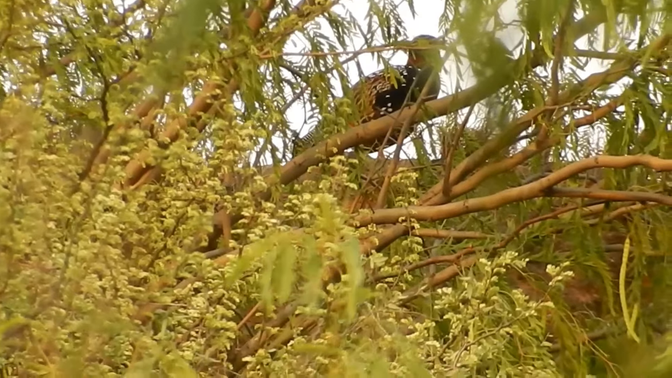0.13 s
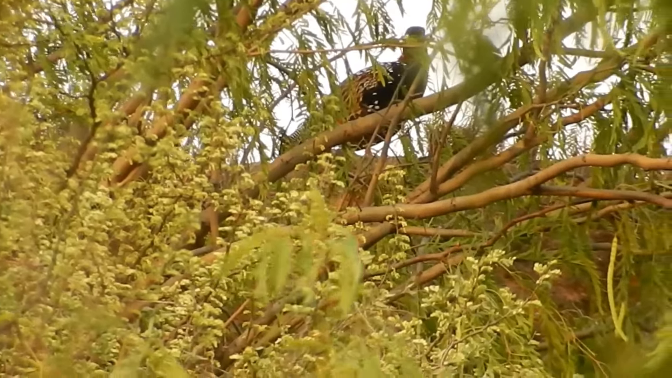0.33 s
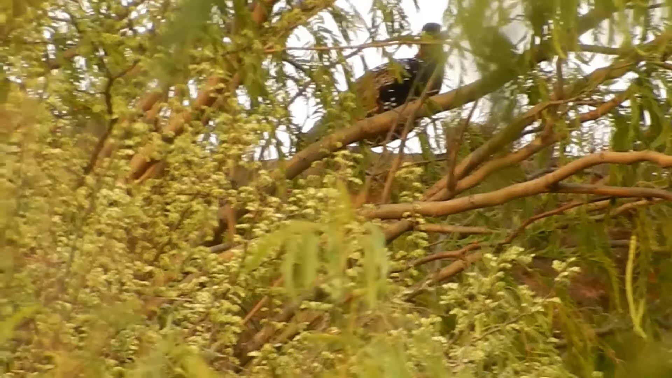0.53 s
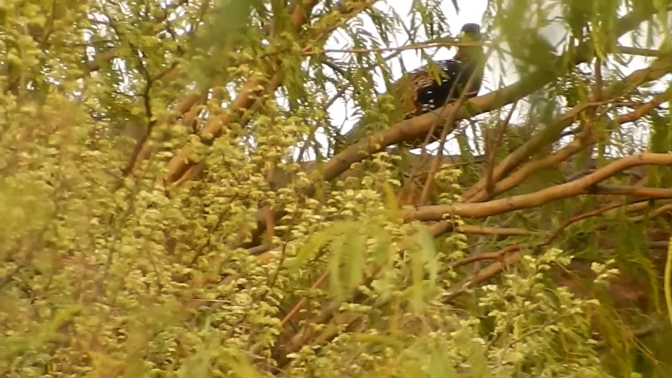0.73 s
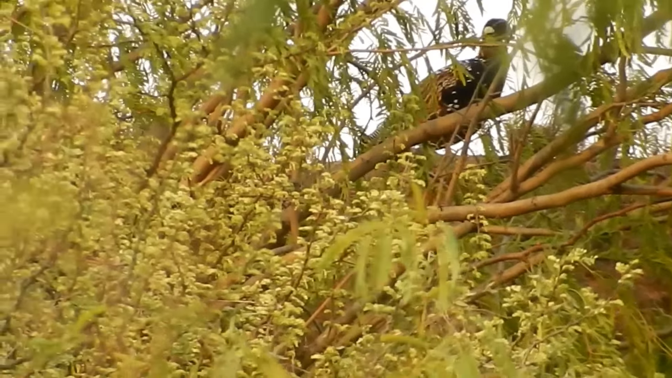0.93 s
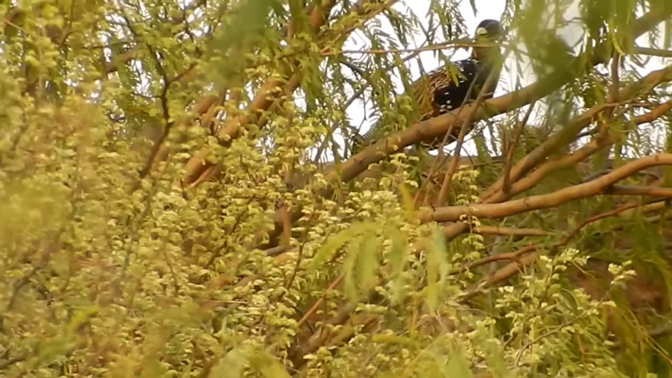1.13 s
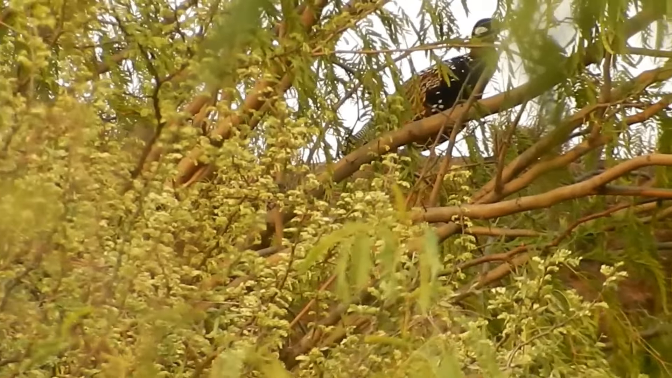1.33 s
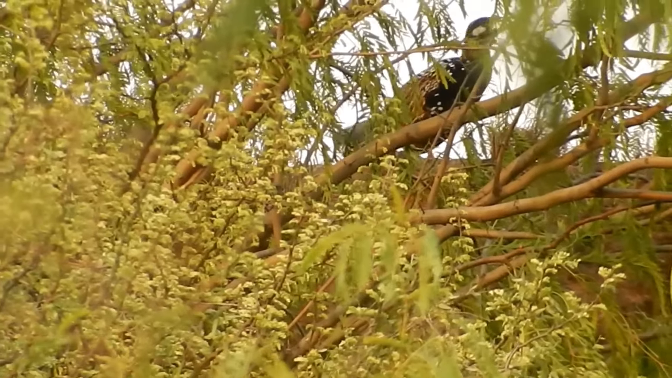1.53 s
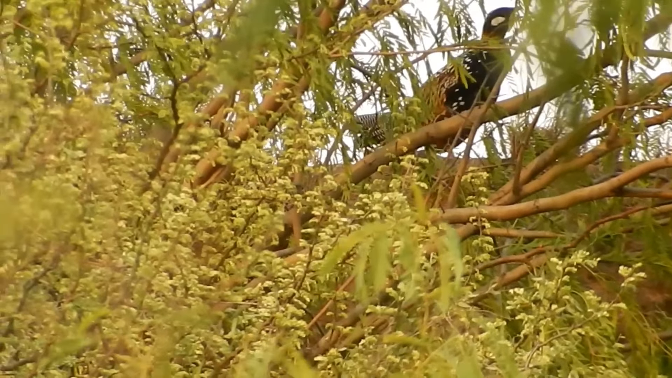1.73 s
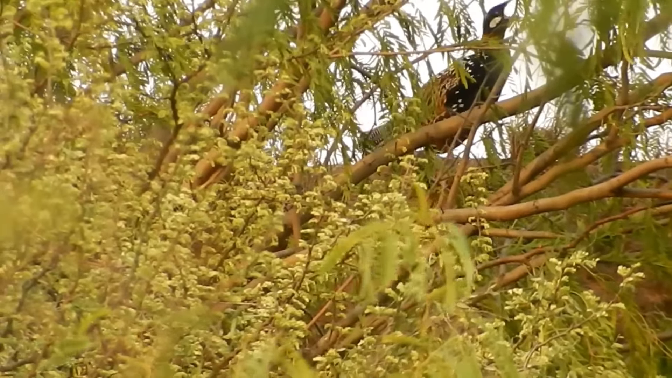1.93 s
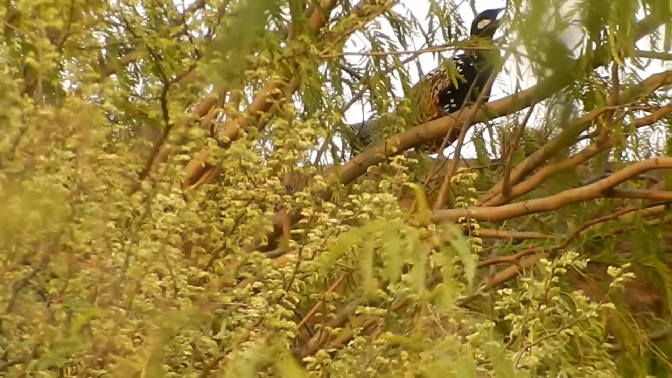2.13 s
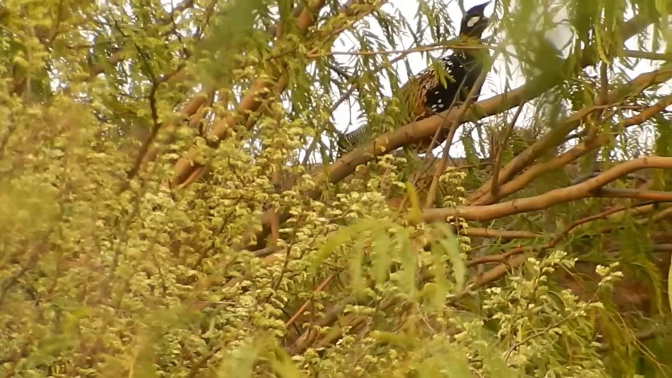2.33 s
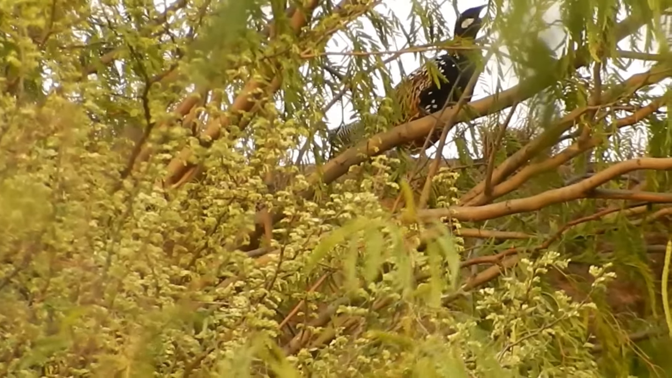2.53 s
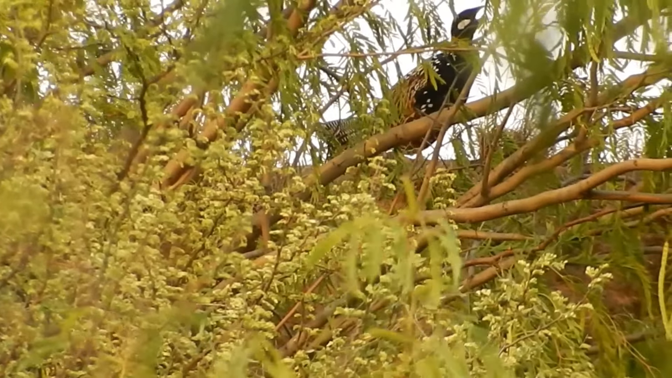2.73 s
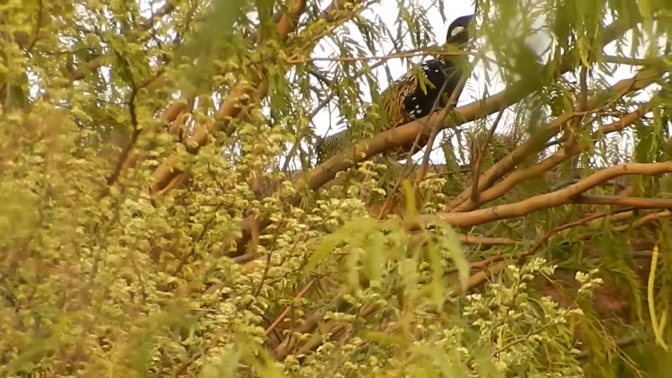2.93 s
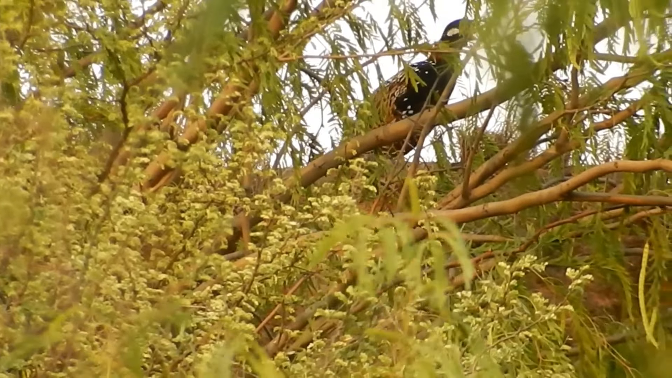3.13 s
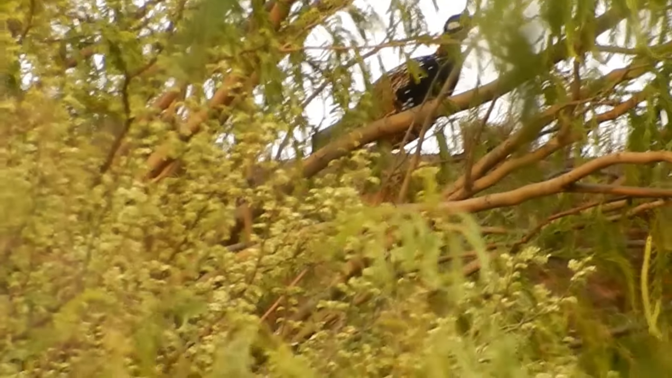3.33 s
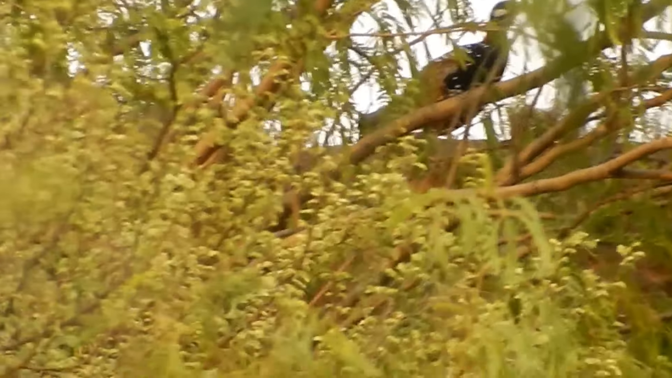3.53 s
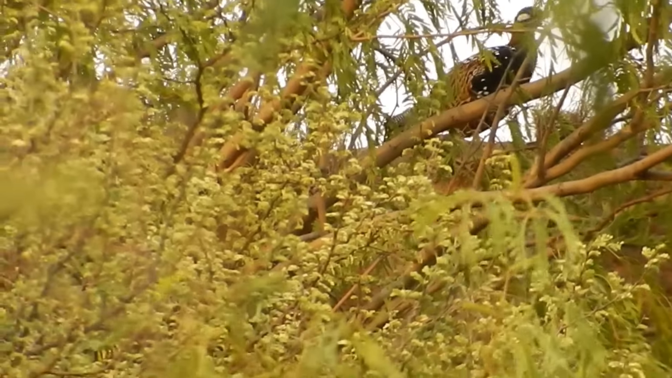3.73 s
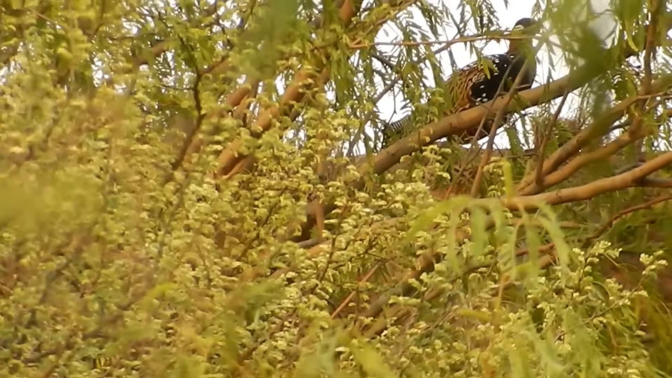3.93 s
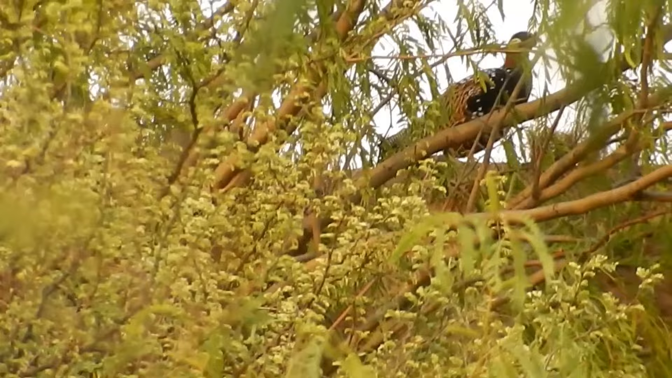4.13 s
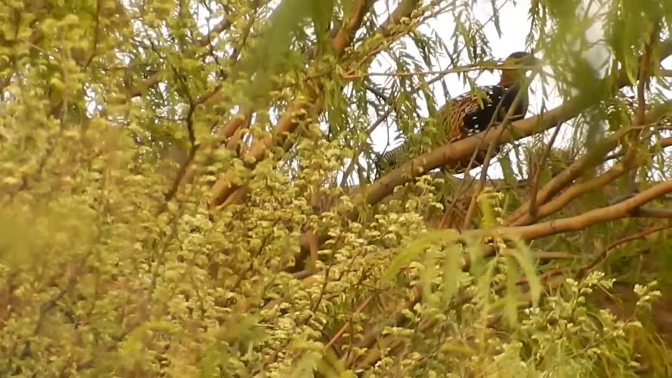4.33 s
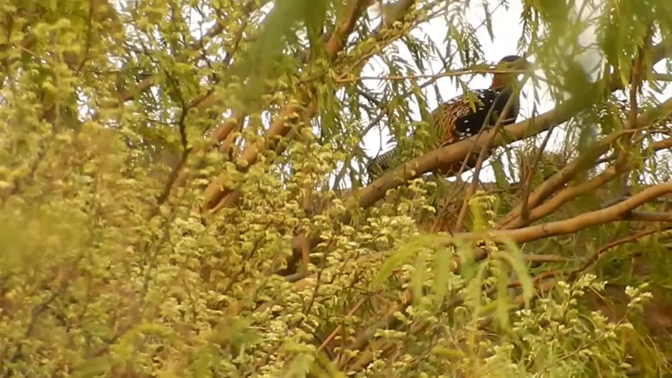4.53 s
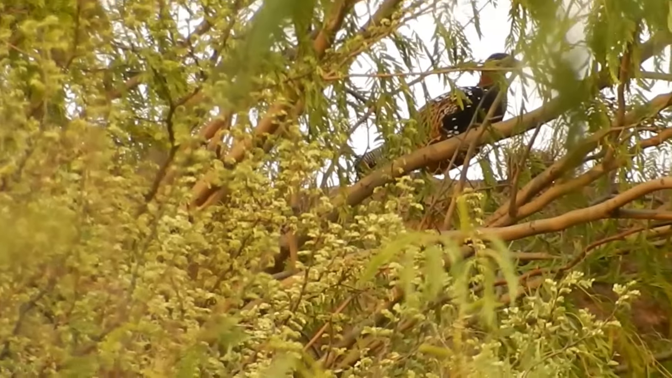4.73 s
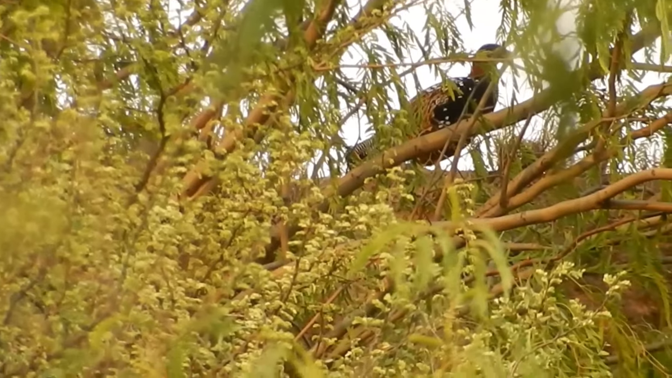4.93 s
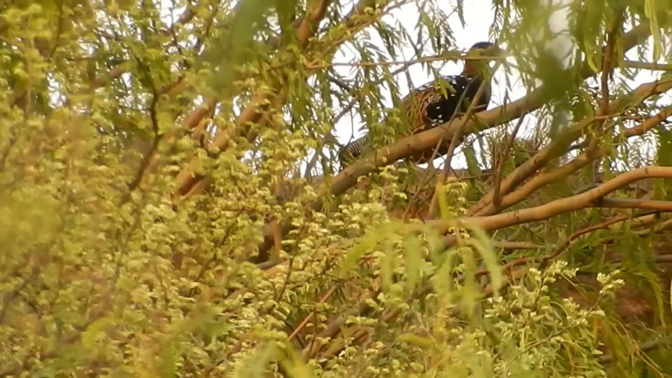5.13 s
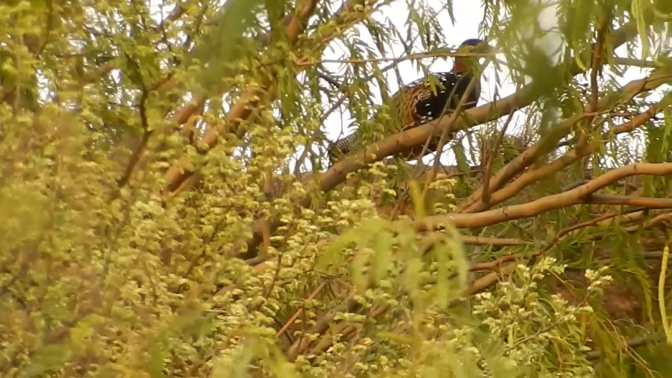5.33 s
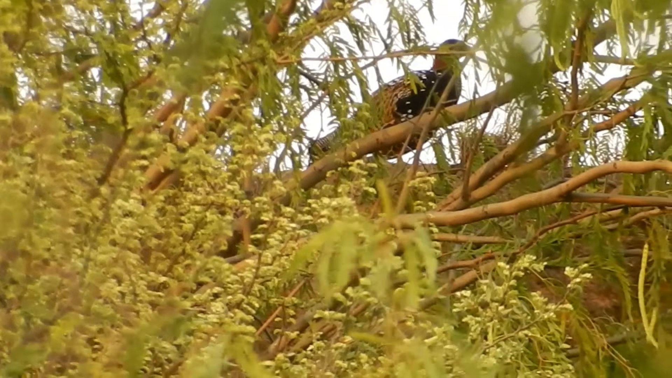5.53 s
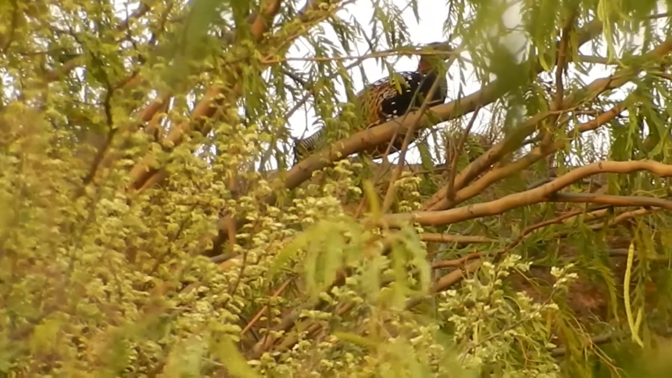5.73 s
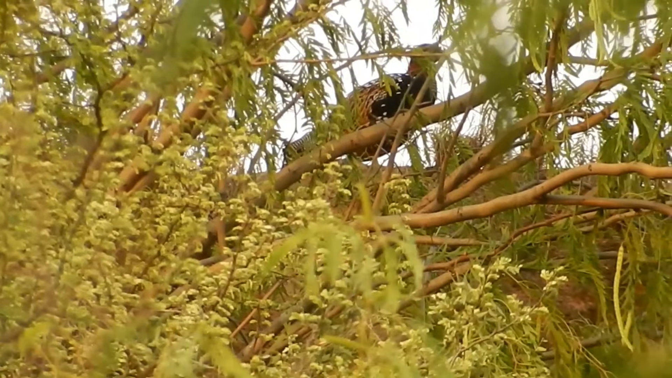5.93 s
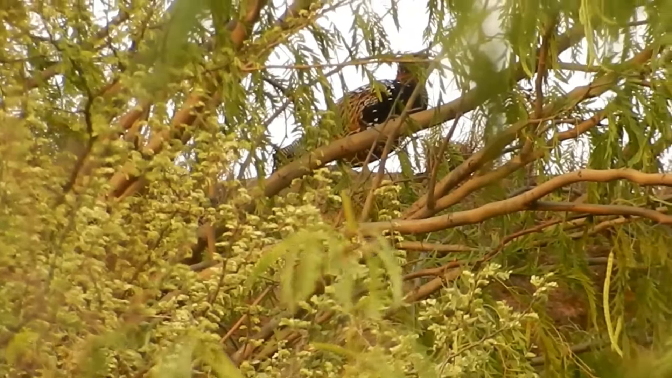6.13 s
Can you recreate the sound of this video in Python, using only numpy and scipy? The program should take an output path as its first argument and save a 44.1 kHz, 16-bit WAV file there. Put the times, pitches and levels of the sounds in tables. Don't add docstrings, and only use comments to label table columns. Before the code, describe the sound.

Quiet open woodland with soft low rumble, wind and leaf hiss. Nearly two seconds in, a ground bird up in a tree gives a sharp click and tiny high whistle, then four loud, metallic, rasping buzzes in two pairs. Trees return a diffuse echo. Later a faint short croak and sparse distant birds are heard. The stereo microphone is outdoors, at some distance from the caller.

```python
import sys
import numpy as np
from scipy import signal
from scipy.io import wavfile
from scipy.ndimage import uniform_filter1d

SR = 44100
rng = np.random.default_rng(int(sys.argv[2]) if len(sys.argv) > 2 else 0)


def volts_from_db(level):
    exponent = np.asarray(level, float) / 20
    return 10 ** exponent


def master_out(mix):
    frames = np.transpose(np.atleast_2d(mix))
    ceiling = np.clip(frames, -1, 1)
    pcm = np.round(ceiling * 32767).astype(np.int16)
    wavfile.write(sys.argv[1], SR, pcm)


N = 272582

# start in seconds, end in seconds, level in dB,
# opening shortfall in dB, flutter in cycles per second.
NOTES = [
    (2.236, 2.425, -23, 9.5, 244),
    (2.608, 2.84, -25, 20, 244),
    (3.112, 3.243, -25.5, 16, 243),
    (3.299, 3.525, -25.5, 13.5, 245),
]
# multiple of the pitch, level in dB.
BUZZ_OVERTONES = [(2, -31.5), (3, -26.5)]
# centre in Hz, width in Hz, gain in dB.
THROAT_MODES = [(2190, 302, 3.5), (2754, 360, 8.5), (3658, 480, 15.5), (4430, 400, 3), (5293, 660, 2.5)]
# centre in Hz, width in Hz, gain in dB.
BEAK_MODES = [(6585, 1080, 8.5), (8080, 900, 1.5), (11700, 1100, -11)]
# start, end, crest and dip in seconds, level in dB.
WHISTLES = [
    (1.8178, 1.847, 1.8365, 1.8345, -27),
    (2.77, 2.803, 2.788, 2.782, -32),
    (3.366, 3.392, 3.38, 3.379, -34),
]
# partial number, level in dB re the fourth.
WHISTLE_PARTIALS = [(1, -30), (2, -29), (6, -41), (7, -31), (8, -42), (10, -54)]
# time in seconds, peak in dB.
SNAPS = [
    (1.8172, -34.5),
    (1.8448, -33),
    (2.7995, -31),
]
# start and end in seconds, from Hz, to Hz, peak in dB.
CLICK = [
    (1.774, 1.783, 1640, 1500, -32),
    (1.781, 1.799, 2450, 1300, -34),
]
CLICK_PARTIALS_DB = [
    (-18, 0, -17, -21.5, -31.5, -35, -49),
    (-4.5, 0, -10.5, -38.5, -38.5, -44.5, -43),
]
# peak in seconds, pitch in Hz, level in dB,
# rise in seconds, fall in seconds.
GRUNTS = [
    (2.42, 1192, -54.5, 0.027, 0.0059),
    (2.615, 1303, -52, 0.0056, 0.04),
    (2.83, 1326, -49, 0.017, 0.0072),
    (3.12, 1236, -49.5, 0.0083, 0.027),
    (3.228, 1284, -50, 0.016, 0.008),
    (3.303, 1244, -51.5, 0.0043, 0.025),
    (3.51, 1225, -54.5, 0.017, 0.016),
]
# start and end in seconds, from Hz, to Hz, peak in dB.
FAR_BIRDS = [(3.26, 3.349, 601, 549, -63.5), (4.07, 4.102, 2027, 2066, -75),
             (4.096, 4.112, 1995, 1400, -71.5), (4.14, 4.19, 6140, 5770, -83.5),
             (4.173, 4.196, 5300, 5600, -76.5), (4.19, 4.215, 4360, 4430, -75.5),
             (4.175, 4.25, 2640, 2690, -75), (4.175, 4.21, 1800, 1710, -74.5),
             (5.235, 5.3, 3760, 3300, -80.5), (5.31, 5.38, 2950, 2750, -78), (5.5, 5.564, 3210, 3160, -79),
             (5.59, 5.617, 3180, 3170, -77.5), (5.755, 5.795, 3780, 4330, -77.5),
             (5.785, 5.876, 4290, 4330, -71.5), (5.94, 5.989, 3480, 3400, -76)]
# time in seconds, level in dB.
INSECT = [
    (.17, -84),
    (.52, -87),
    (.85, -97),
]
# frequency in Hz, 60 dB decay time in seconds.
ECHO_T60 = [(1000, 3.9), (3000, 1.42), (5500, 1.1), (9000, 1.4), (14000, .3)]
# frequency in Hz, density in dB per Hz.
AIR = [(12, -42), (20, -12), (49, -0.5), (124, 0.5), (209, -5.5), (313, -8), (352, -9), (1100, -18.5),
       (1390, -24), (1890, -17.5), (2460, -30), (3120, -27.5), (3950, -29.5), (5770, -39.5), (7500, -64),
       (12700, -120)]
# centre in Hz, width in Hz, level in dB.
AIR_BANDS = [(1148, 60, -77), (1870, 210, -74.5), (2950, 650, -75), (5960, 170, -89.5), (10700, 7500, -96)]
# frequency in Hz, left-right likeness from -1 to 1.
LIKENESS = [(60, 0.2), (180, 0.21), (560, 0.23), (1730, 0.39), (5320, 0.17)]

OPEN_S, RELEASE_S, RELEASE_DB = 0.012, 0.032, 26
SWELL_DB = (4, -2.8)
RESUME_DB, RESUME_S = 3, 0.0048
WHISTLE_OVERLAP_S = 0.004
FLUTTER_SAG_HZ, SAG_S = 33, 0.08
CREST_HZ, CREST_RISE_HZ_PER_S, CREST_HZ_PER_DB, ARCH_DEPTH_HZ = 4951, 1900, 90.5, 2779
WEAK_ARCH_DB, WEAK_ARCH_DEPTH, STRONG_SHARE = -6, 0.7, 0.6
ROUGH, ROUGH_WANDER, THROAT_WANDER_DB = 0.26, 0.04, 2.2
VOICE_BAND_HZ, RASP_BAND_HZ, OVERTONE_GAP_HZ = (1530, 5130), (350, 1500), (13300, 15100)
RASP_DB, FUNDAMENTAL_DB = -36.5, -44.5
WHISTLE_CREST_HZ, RISE_HZ_PER_MS2, FALL_HZ_PER_MS2 = 5620, 1.6, 2.8
DIP_DB, DIP_S, AFTER_DIP_DB, SURGE_DB, SURGE_S = 14, 0.0025, -4.5, 5, 0.0025
CLICK_ROUGH, CLICK_EDGE_DB, GRUNT_EDGE_DB, FAR_EDGE_DB = (0.1, 0.2), 10, 9, 4.5
CROAK_S, CROAK_HOLD_END_S, CROAK_SETTLE_S, CROAK_PULSES_PER_S = 4.495, 4.577, 0.012, 170
CROAK_LOWER_HZ, CROAK_UPPER_HZ = 1344, 2800
CROAK_DB, CROAK_UPPER_DB, CROAK_ACCENT_DB = -50, -8, 4
PUFF_DELAY_S, PUFF_DB, PUFF_FADE_S = 0.028, -7, 0.05
TICK_S, TICK_DB = 4.4695, -53
NEAR_ECHO_DB, NEAR_T60_S = -13, 0.06
MID_ECHO_DB, MID_T60_SHARE = -17.5, 0.27
FAR_ECHO_DB = -28
AIR_DB = -55
AIR_DIP_HZ, AIR_DIP_WIDTH_HZ, AIR_DIP_SHARE = 2700, 210, 0.72
TREBLE_SIDE_DB = -12.5
SKEW_DB = -18


def rms_one(x):
    return x / np.sqrt(np.mean(x ** 2) + 1e-20)


def at_hz(points, hz):
    table_hz, values = np.transpose(points)
    return np.interp(np.log(hz), np.log(table_hz), values)


def filtered(x, order, hz, kind):
    return signal.sosfilt(signal.butter(order, hz, kind, fs=SR, output="sos"), x)


def drift(rate_hz, size=N):
    r = np.exp(-2 * np.pi * rate_hz / SR)
    return rms_one(signal.lfilter([1], [1, -2 * r, r * r], rng.standard_normal(size + SR))[SR:])


def phase_of(hz):
    return 2 * np.pi * np.cumsum(hz) / SR


def resonance(x, hz, width_hz):
    r = np.exp(-np.pi * width_hz / SR)
    poles = [1, -2 * r * np.cos(2 * np.pi * hz / SR), r * r]
    return signal.lfilter(np.array([1, 0, -1]) * (1 - r * r) / 2, poles, x)


def through(modes, x):
    return sum(volts_from_db(db) * resonance(x, hz, width_hz) for hz, width_hz, db in modes)


def note(rows, fade_s=0.0019):
    s, *columns = np.transpose(rows)
    at = np.arange(int(s[0] * SR), int(s[-1] * SR))
    gate = np.clip(np.minimum(at - at[0], at[-1] - at) / (fade_s * SR), 0, 1)
    return at, gate, [np.interp(at / SR, s, c) for c in columns]


def arch(row, edge_db):
    start, end, from_hz, to_hz, db = row
    middle = ((start + end) / 2, (from_hz + to_hz) / 2, db)
    return [(start, from_hz, db - edge_db), middle, (end, to_hz, db - edge_db)]


def breath(t, place):
    start, end, level_db, short_db, rate_hz = NOTES[place]
    level_db = level_db + SWELL_DB[place % 2] * ((t - start) / (end - start) - 0.5)
    level_db = level_db - short_db * np.exp(-(t - start) / OPEN_S)
    level_db = level_db - RELEASE_DB * np.clip(1 - (end - t) / RELEASE_S, 0, 1) ** 2
    since = t - start
    for stop, resume, *_ in WHISTLES:
        stop, resume = stop + WHISTLE_OVERLAP_S, resume - WHISTLE_OVERLAP_S
        if start < stop < end:
            since = np.where(t > resume, t - resume, since)
            mute = np.clip(np.minimum((t - stop) / 0.003, (resume - t) / 0.002), 0, 1)
            mute_db = 60 * mute + RESUME_DB * (t > resume - 0.002)
            level_db = level_db - np.where(t > resume, RESUME_DB * np.exp(-since / RESUME_S), mute_db)
    return level_db, since, rate_hz - FLUTTER_SAG_HZ * np.clip(1 - (end - t) / SAG_S, 0, 1)


def buzz():
    out = np.zeros(N)
    for place, (start, end, *_) in enumerate(NOTES):
        at, gate, (t,) = note([(start, start), (end, end)])
        n = len(at)
        level_db, since, rate_hz = breath(t, place)
        rough = np.clip(ROUGH + ROUGH_WANDER * drift(12, n), 0.08, 0.4)
        cycle = np.cumsum(rate_hz * (1 + 0.22 * rough * drift(120, n))) / SR % 1
        strong = cycle < STRONG_SHARE
        along = np.where(strong, cycle / STRONG_SHARE, (cycle - STRONG_SHARE) / (1 - STRONG_SHARE))
        sag = np.cos(np.pi * along) ** 2
        sag = np.where(strong, sag, sag * WEAK_ARCH_DEPTH)

        effort_hz = CREST_HZ_PER_DB * np.clip(level_db + 24, 0, 4)
        crest_hz = CREST_HZ + CREST_RISE_HZ_PER_S * since + effort_hz
        pitch_hz = crest_hz - ARCH_DEPTH_HZ * sag + 600 * rough * drift(500, n)
        pinch = 1 - 0.7 * sag ** 4
        strength = pinch * volts_from_db(WEAK_ARCH_DB * ~strong + 6 * rough * drift(400, n))
        carrier = phase_of(pitch_hz)
        tone = strength * np.sin(carrier)

        throat = sum(volts_from_db(THROAT_WANDER_DB * drift(35, n)) * through([mode], tone) for mode in THROAT_MODES)
        voiced = filtered(throat + 0.5 * tone, 4, VOICE_BAND_HZ, "band")
        voiced = voiced / np.sqrt(uniform_filter1d(voiced ** 2, size=900) + 1e-6)
        rasp = voiced ** 2 * (1 + 8.4 * rng.standard_normal(n))
        rasp = volts_from_db(RASP_DB) * rms_one(filtered(rasp, 2, RASP_BAND_HZ, "band"))
        fundamental = volts_from_db(FUNDAMENTAL_DB) * strength * np.sin(carrier / 4)
        overtones = sum(volts_from_db(db) * strength * np.sin(k * carrier) for k, db in BUZZ_OVERTONES)
        beak = filtered(through(BEAK_MODES, through(BEAK_MODES, overtones)), 3, OVERTONE_GAP_HZ, "bandstop")
        out[at] += gate * volts_from_db(level_db) * (rms_one(voiced) + beak + rasp + fundamental)
    return out


def whistles():
    out, snaps = np.zeros(N), np.zeros(N)
    for start, end, crest, dip, level_db in WHISTLES:
        at, gate, (t,) = note([(start, start), (end, end)], fade_s=0.001)
        bend = np.where(t < crest, RISE_HZ_PER_MS2, FALL_HZ_PER_MS2)
        hz = WHISTLE_CREST_HZ - bend * (1000 * (t - crest)) ** 2
        lead_db = AFTER_DIP_DB * (t > dip) - DIP_DB * np.exp(-((t - dip) / DIP_S) ** 2)
        lead_db = lead_db + SURGE_DB * np.exp(-((end - SURGE_S - t) / SURGE_S) ** 2)
        turn = phase_of(hz / 4)
        others = sum(volts_from_db(db) * np.sin(k * turn) for k, db in WHISTLE_PARTIALS)
        out[at] += gate * volts_from_db(level_db + 3) * (volts_from_db(lead_db) * np.sin(4 * turn) + others)
    burst = np.hanning(70) * np.sin(phase_of(np.linspace(2500, 4600, 70)))
    for s, db in SNAPS:
        snaps[round(s * SR):][:70] = volts_from_db(db + 12) * burst
    ring = through([(2750, 270, 0.5), (3620, 180, 2.5)], snaps + 1e-18)
    return out + ring + 0.5 * snaps


def click():
    out = np.zeros(N)
    for row, rough, partials_db in zip(CLICK, CLICK_ROUGH, CLICK_PARTIALS_DB):
        at, gate, (hz, level_db) = note(arch(row, CLICK_EDGE_DB))
        n = len(at)
        turn = phase_of(hz * (1 + 0.36 * rough * drift(370, n)))
        stack = sum(volts_from_db(db) * np.sin(k * turn) for k, db in enumerate(partials_db, 1))
        out[at] += gate * volts_from_db(level_db + 10 * rough * drift(350, n)) * stack
    return out


def grunts():
    out = np.zeros(N)
    for s, pitch_hz, db, rise_s, fall_s in GRUNTS:
        edge_db = db - GRUNT_EDGE_DB
        rows = [(s - rise_s, pitch_hz, edge_db), (s, pitch_hz, db), (s + fall_s, pitch_hz, edge_db)]
        at, gate, (hz, level_db) = note(rows, fade_s=0.0041)
        n = len(at)
        level = volts_from_db(level_db + 2.5 + 3.5 * drift(220, n))
        out[at] += gate * level * np.sin(phase_of(hz * (1 + 0.07 * drift(250, n))))
    return out


def trees(x):
    t = np.arange(int(1.5 * SR)) / SR
    edges_hz = 700 * 2 ** np.arange(0, 5, 0.5)
    far, mid = 0, 0
    for low, high in zip(edges_hz, edges_hz[1:]):
        band = filtered(rng.standard_normal((3, len(t))), 2, [low, high], "band")
        fall_db = -60 * t / at_hz(ECHO_T60, np.sqrt(low * high))
        far = far + band * volts_from_db(fall_db)
        mid = mid + band[:, ::-1] * volts_from_db(fall_db / MID_T60_SHARE)
    near = rng.standard_normal((3, len(t))) * volts_from_db(-60 * t / NEAR_T60_S)
    echo = volts_from_db(FAR_ECHO_DB) * rms_one(far) + volts_from_db(MID_ECHO_DB) * rms_one(mid)
    echo = echo + volts_from_db(NEAR_ECHO_DB) * rms_one(near)
    echo = (echo[0] + 0.23 * echo[1:]) / np.sqrt(len(t))
    return signal.fftconvolve(x[None], echo, axes=1)[:, :N]


def far_birds():
    out = np.zeros(N)
    for row in FAR_BIRDS:
        at, gate, (hz, level_db) = note(arch(row, FAR_EDGE_DB))
        n = len(at)
        level = volts_from_db(level_db + 8 + 3 * drift(40, n))
        out[at] += gate * level * np.sin(phase_of(hz * (1 + 0.007 * drift(90, n))))
    return out


def croak():
    start, hold, db, up_db = CROAK_S, CROAK_HOLD_END_S, CROAK_DB, CROAK_DB + CROAK_UPPER_DB
    puff = hold + PUFF_DELAY_S
    rows = [(start, db + CROAK_ACCENT_DB, up_db - 8), (start + CROAK_SETTLE_S, db, up_db + 2.9),
            (hold, db, up_db - 2.5), (hold + CROAK_SETTLE_S, db - 19, up_db - 8),
            (puff, db + PUFF_DB, up_db - 30), (puff + PUFF_FADE_S, db - 35, up_db - 30)]
    at, gate, (lower_db, upper_db) = note(rows, fade_s=0.0027)
    n = len(at)
    turn = phase_of(CROAK_PULSES_PER_S * (1 + 0.25 * drift(60, n + 1)))
    pulses = np.diff(np.floor(turn / (2 * np.pi)))
    drive = rms_one(pulses * volts_from_db(7 * rng.standard_normal(n))) + 2.6 * rng.standard_normal(n)
    lower = rms_one(resonance(resonance(drive, CROAK_LOWER_HZ, 110), CROAK_LOWER_HZ, 5.6 * 110))
    upper = rms_one(resonance(resonance(drive, CROAK_UPPER_HZ, 260), CROAK_UPPER_HZ, 5.6 * 260))
    upper = upper + 0.12 * rms_one(resonance(resonance(drive, 3800, 1700), 3500, 1500))
    out = np.zeros(N)
    out[at] = gate * (volts_from_db(lower_db) * lower + volts_from_db(upper_db) * upper)
    tick = np.hanning(130) * np.sin(phase_of(np.linspace(2100, 1300, 130)))
    out[round(TICK_S * SR):][:130] += volts_from_db(TICK_DB) * tick
    return filtered(out, 4, 5200, "low")


def insect():
    t = np.arange(N) / SR
    puffs = sum(volts_from_db(db) * np.exp(-((t - s) / 0.019) ** 2) for s, db in INSECT)
    return puffs * rms_one(resonance(resonance(rng.standard_normal((2, N)), 11300, 2200), 11300, 3000))


def air():
    out, gust = 0, drift(0.8)
    edges_hz = 20 * 2 ** np.arange(0, 10, 0.5)
    white = rng.standard_normal((2, 2, N))
    for k, (low, high) in enumerate(zip(edges_hz, edges_hz[1:])):
        mid, side = filtered(white[k % 2], 2, [low, high], "band")
        hz = np.sqrt(low * high)
        alike = at_hz(LIKENESS, hz)
        gain = volts_from_db(at_hz(AIR, hz) + 0.067 * gust + 2.4 * drift(8.3))
        out = out + gain * (np.sqrt(1 + alike) * mid + np.sqrt(1 - alike) * side * [[1], [-1]])
    out = out - AIR_DIP_SHARE * resonance(out, AIR_DIP_HZ, AIR_DIP_WIDTH_HZ)
    out = volts_from_db(AIR_DB) * rms_one(out)
    for hz, width_hz, db in AIR_BANDS:
        noise = rng.standard_normal((3, N))
        shared, left, right = resonance(resonance(noise, hz, width_hz), hz, width_hz)
        out += volts_from_db(db + 1.232 * drift(8.9)) * rms_one(shared + 0.703 * np.array([left, right]))
    return out


def scene():
    bird = buzz() + whistles() + click() + grunts()
    far = far_birds() + croak()
    scatter = rng.choice([-1, 1], 400) * np.hanning(400) / 12
    treble = filtered(np.convolve(bird, scatter)[:N], 4, 6500, "high")
    direct = bird * volts_from_db(np.array([[-0.3], [0.3]])) + volts_from_db(TREBLE_SIDE_DB) * treble * [[1], [-1]]
    return direct + far + trees(bird + 0.6 * far) + insect() + air()


def top_cut(x):
    return signal.sosfilt(signal.butter(12, 15750, fs=SR, output="sos"), x)


def record(dry):
    mix = dry + volts_from_db(SKEW_DB) * dry ** 2
    return top_cut(mix)


dry = scene()
out = record(dry)
master_out(out)
```